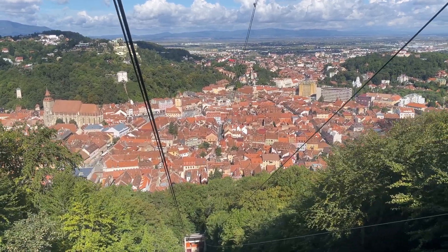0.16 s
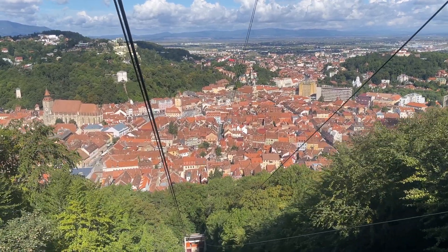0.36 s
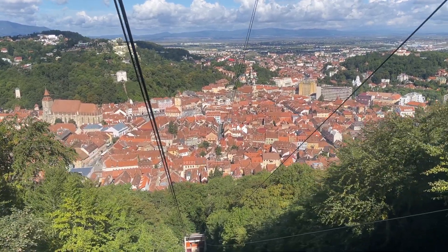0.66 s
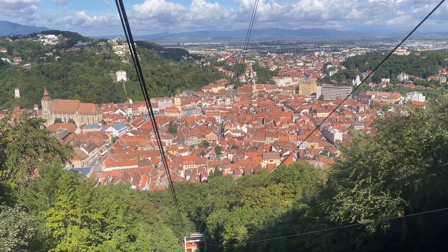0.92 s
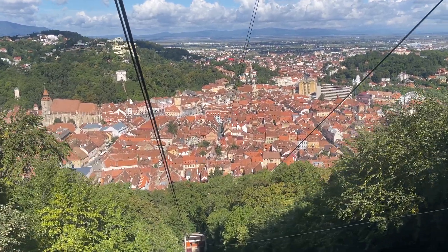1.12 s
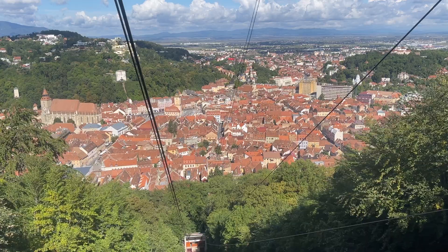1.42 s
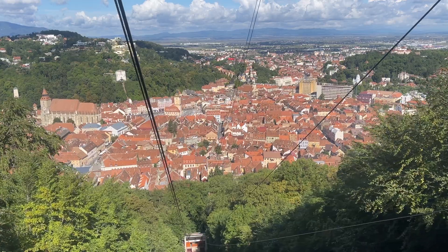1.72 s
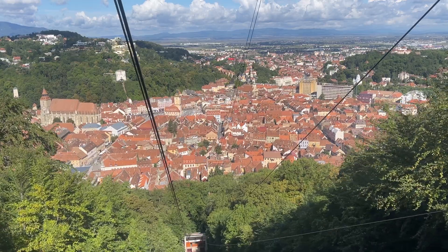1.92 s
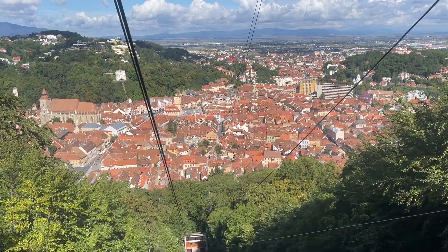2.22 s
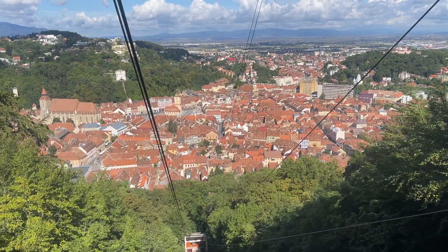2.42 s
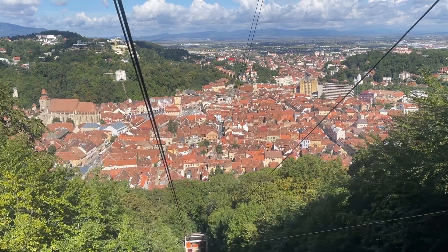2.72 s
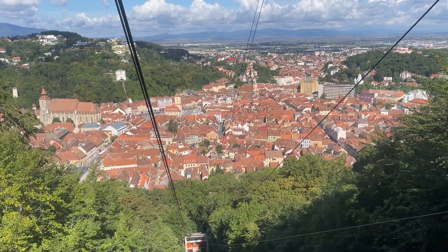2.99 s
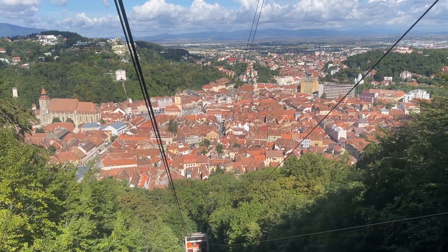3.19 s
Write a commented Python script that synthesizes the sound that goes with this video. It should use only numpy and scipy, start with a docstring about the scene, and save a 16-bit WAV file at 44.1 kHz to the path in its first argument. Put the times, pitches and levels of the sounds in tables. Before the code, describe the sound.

A cable car cabin rumbles deeply along its ropes, heard from inside in close stereo; muffled roar wavers, soft rustles and dull knocks sit beneath, and a light click comes at the very end.

```python
"""Cable car wheels throb in a deep drone, heard by a stereo microphone inside the cabin as it runs down its ropes.
The drone sums sine waves at multiples of the wheel rate, about six turns a second.
Filtered noise makes the rolling rumble, the roar on the rope, the hollow walls and the faintly ringing panels.
Grainy noise makes soft rustles, probably clothing, and small squeaks; short knocks are half buried in the roar.
At the end comes a light click: noise for its contacts, decaying sines for the fitting that they strike."""
import sys
import numpy as np
from scipy import signal
from scipy.io import wavfile
from scipy.ndimage import map_coordinates

SR = 44100
rng = np.random.default_rng(int(sys.argv[2]) if len(sys.argv) > 2 else 0)


def bounce(signal):
    """Save signal as a 16-bit WAV file at the path given by the first command-line argument."""
    frames = np.transpose(np.atleast_2d(signal))
    limited = np.clip(frames, -1, 1)
    pcm = np.round(limited * 32767).astype(np.int16)
    wavfile.write(sys.argv[1], SR, pcm)


N = 147735
T = np.arange(N) / SR  # seconds
LEFT_RIGHT = np.array([[1], [-1]])  # sign of a stereo difference


def from_db(db):
    """Decibels to amplitude gain."""
    return 10 ** (np.asarray(db) / 20)


def rms_one(x):
    """Scale to unit power."""
    return x / np.sqrt(np.mean(x ** 2) + 1e-20)


def at_hz(points, hz):
    """Read a table on a log-frequency axis."""
    table_hz, value = np.transpose(points)
    return np.interp(np.log(hz), np.log(table_hz), value)


def drift(rate):
    """Slow random wander of spread 1, from smoothed noise; a higher rate wanders faster."""
    step = 100  # samples between slow points
    pole = np.exp(-2 * np.pi * step * rate / SR)
    noise = rng.standard_normal(N // step + 2002)
    slow = signal.lfilter([1], [1, -2 * pole, pole * pole], noise)[2000:]  # drop the run-in
    return np.interp(np.arange(N) / step, np.arange(len(slow)), rms_one(slow - slow.mean()))


def envelope(start, attack, hold, release):
    """Straight rise, then exponential fall; hold counts from the start and includes the rise."""
    rise = np.clip((T - start) / attack, 0, 1)
    return rise * np.exp(-np.maximum(T - start - hold, 0) / release)


def cut_above(x, edge_hz):
    """Steep low-pass."""
    return signal.sosfilt(signal.butter(12, edge_hz, fs=SR, output="sos"), x)


# How alike the two microphone sides hear the cabin. Each row: frequency in Hz, correlation from -1 to 1.
SIDE_LIKENESS = [(40, 0.97), (120, 0.92), (280, 0.88), (500, 0.73), (800, 0.17), (1200, 0.036),
                 (2200, 0.37), (4500, 0.62), (9000, .93)]
# Lean of the cabin sound to one side. Each row: frequency in Hz, left minus right in dB.
SIDE_BALANCE = [(40, -3), (130, -4), (300, -2.5), (650, -0.5), (1300, -2.5), (2600, 2), (5000, 2.5),
                (9000, 0.5)]


def stereo_band(low, high, order=2):
    """A band of noise whose mid and side parts give the cabin's left-right likeness and balance."""
    sos = signal.butter(order, [low, min(high, SR / 2 - 10)], "band", fs=SR, output="sos")
    noise = rng.standard_normal((2, N + SR // 2))
    mid, side = signal.sosfilt(sos, noise)[:, -N:]  # drop the run-in
    hz = np.sqrt(low * high)
    alike = np.clip(at_hz(SIDE_LIKENESS, hz), -.999, .999)
    pair = np.sqrt(1 + alike) * mid + np.sqrt(1 - alike) * side * LEFT_RIGHT
    return pair * from_db(LEFT_RIGHT * at_hz(SIDE_BALANCE, hz) / 2)


def resonance(hz, width_hz):
    """Noise ringing in one resonance; rms 1."""
    return rms_one(stereo_band(max(hz - width_hz / 2, 20), hz + width_hz / 2))


def coloured_noise(spectrum, flicker_db, flicker_per_s):
    """Third-octave bands across the spectrum, each flickering on its own; rms 1."""
    edges = 15.6 * 2 ** (np.arange(30) / 3)  # Hz
    out = 0
    for low, high in zip(edges, edges[1:]):
        hz = np.sqrt(low * high)
        octaves_outside = max(np.log2(spectrum[0][0] / hz), np.log2(hz / spectrum[-1][0]), 0)
        if octaves_outside > 1:
            continue
        skirt_db = -24 * octaves_outside
        band_db = at_hz(spectrum, hz) + skirt_db + flicker_db * drift(flicker_per_s)
        out = out + from_db(band_db) * stereo_band(low, high, order=3)
    return rms_one(out)


SNAGS_PER_S, SNAG_S, SNAG_SHARE = 140, .002, .22  # mean rate, decay, share of the power


def snags():
    """Friction catches and lets go: a gain with sharp little peaks at random; rms 1."""
    catches = (rng.random(N) < SNAGS_PER_S / SR) * rng.exponential(1, N)
    power = signal.lfilter([1], [1, -np.exp(-1 / (SNAG_S * SR))], catches + 1e-18)
    return np.sqrt(1 - SNAG_SHARE + SNAG_SHARE * power / power.mean())


WHEEL_HZ = 6.285  # turns a second
DRONE_DB, DRONE_PAN_DB = 0.2, -0.5  # gain on all multiples; half of left minus right
SWELL_DB, SWELL_PER_S, SLIP_RAD = 1.0, 1.09, 0.58  # spread of level, rate of both wanders, spread of phase
THUMP_S, THUMP_SMEAR_RAD = 1.243, 1.235  # time of one thump; how loosely the multiples line up on it
# Strong multiples of the wheel rate. Each row: multiple, level in dB before DRONE_DB and the swells.
WHEEL_MULTIPLES = [(7, -34.5), (8, -35), (9, -25.5), (10, -34), (11, -21), (12, -33.5), (13, -25),
                   (15, -27), (16, -26.5), (19, -36.5), (27, -38.5), (29, -36.5), (30, -39), (33, -38),
                   (39, -40.5), (40, -41)]
# Slow swells and dips of single multiples.
# Each row: multiple, centre in seconds, seconds from there until 1/e of the gain in dB, gain in dB.
MULTIPLE_SWELLS = [(7, 0.13, 0.35, 6.5), (7, 3.6, .25, 7), (9, 1.55, 0.55, 8), (9, 3, .22, 5),
                   (9, 0.15, .15, -8.5), (10, 3.5, 0.12, 9.5), (11, 0.43, 0.59, 5), (12, 4.1, .22, 8.5),
                   (13, 1.3, 0.2, 4), (13, .05, .3, -4), (15, 0.038, .25, 5), (15, 2.8, 0.81, 8),
                   (16, 1.65, 0.13, -8.5), (16, 2.95, 0.26, 3.5), (19, .35, .25, 13), (19, 1.4, 0.25, 6),
                   (27, 2.3, 0.41, 8), (29, 0.71, 0.17, 6.5), (30, 1.2, .25, 7), (30, 3.3, 0.15, 6.5),
                   (39, 1.05, 0.52, 6)]


def wheel_drone():
    """Multiples of the wheel rate swell and slip slowly, lining up loosely once a turn."""
    out = 0
    for multiple, db in WHEEL_MULTIPLES:
        swell_db = sum(gain * np.exp(-((T - centre) / length) ** 2)
                       for swelling, centre, length, gain in MULTIPLE_SWELLS if swelling == multiple)
        turning = 2 * np.pi * multiple * WHEEL_HZ * (T - THUMP_S)
        smear = THUMP_SMEAR_RAD * rng.standard_normal()
        phase = turning + smear + SLIP_RAD * drift(SWELL_PER_S)
        level_db = db + DRONE_DB + swell_db + SWELL_DB * drift(SWELL_PER_S)
        out = out + from_db(level_db) * np.sqrt(2) * np.sin(phase)
    return out * from_db(DRONE_PAN_DB * LEFT_RIGHT)


# Colour of the rolling rumble. Each row: frequency in Hz, relative density in dB per Hz.
RUMBLE_COLOUR = [(15, -25.5), (28, -13.5), (45, -2.5), (68, -1.5), (100, -3.5), (145, -12), (200, -15.5),
                 (300, -25.5), (420, -33), (600, -37.5), (1000, -52.5)]


def rumble():
    """Low noise of the cabin rolling along, nearly steady."""
    return from_db(-19) * coloured_noise(RUMBLE_COLOUR, flicker_db=0.5, flicker_per_s=1.7)


# Hollow resonances of the cabin walls. Each row: frequency in Hz, width in Hz, dB relative to the growl level.
WALL_RESONANCES = [(135.8, 28, -5), (180.6, 24, -8), (209, 12, -12), (230.3, 14, -11), (249.47, 14, -5.5),
                   (269.3, 18, -11.5)]
# Growl level over time. Each row: time in seconds, level in dB.
WALL_LEVEL = [(0, -34), (.45, -30), (.8, -25.5), (1.3, -28), (1.7, -32), (1.92, -26.5), (2.35, -26.5),
              (2.7, -32), (3.3, -31.5)]


def growl():
    """Hollow wall resonances, ringing on noise, rise and fall together."""
    level_db = np.interp(T, *np.transpose(WALL_LEVEL))
    return from_db(level_db) * sum(from_db(db) * resonance(hz, width) for hz, width, db in WALL_RESONANCES)


ROAR_DB, ROAR_EDGE_HZ = 1.5, 2260  # gain on roar and hiss; top of the roar
HISS_DB = -24.5  # relative to the roar
# Colour of the wheels roaring on the rope. Each row: frequency in Hz, relative density in dB per Hz.
ROAR_COLOUR = [(200, -3), (400, 0.5), (600, -7), (800, -4.5), (1150, -12), (1500, -17.5), (1950, -23),
               (2400, -27.5)]
# Roar level over time. Each row: time in seconds, level in dB before ROAR_DB.
ROPE_LEVEL = [(.03, -42), (.2, -44), (.38, -42.5), (.47, -46), (.55, -38.5), (.68, -44), (.9, -42),
              (1.18, -44), (1.33, -40.5), (1.52, -41.5), (1.62, -39), (1.75, -42), (1.9, -41), (2.0, -46.5),
              (2.08, -42.5), (2.23, -48), (2.35, -41), (2.58, -47.5), (2.63, -44), (2.8, -49.5),
              (2.92, -40.5), (3.05, -42), (3.22, -49)]
# Colour of the faint air above the roar. Each row: frequency in Hz, relative density in dB per Hz.
HISS_COLOUR = [(2300, 0.5), (3200, -1.5), (4000, -5.5), (5000, -7), (7000, -10), (9000, -8.5),
               (11200, -16.5)]


def rope_roar(level_db):
    """Wheels roar on the rope as fast-flickering noise, with a faint hiss of air above."""
    roar = cut_above(coloured_noise(ROAR_COLOUR, flicker_db=3.0, flicker_per_s=41), ROAR_EDGE_HZ)
    hiss = from_db(HISS_DB) * coloured_noise(HISS_COLOUR, flicker_db=2.5, flicker_per_s=33)
    return from_db(level_db + ROAR_DB) * (roar + hiss)


RING_WANDER_SHARE, RING_WANDER_PER_S = .006, 2  # spread of pitch as a share, rate of wander
RING_FADE_DB, RING_FADE_PER_S = 2.2, 3  # spread of level, rate of wander


def loose_ring(hz, width_hz):
    """A resonance of a flexing panel: its pitch wanders and it comes and goes; rms 1."""
    warped = T + np.cumsum(RING_WANDER_SHARE * drift(RING_WANDER_PER_S)) / SR
    ring = np.array([np.interp(warped, T, side) for side in resonance(hz, width_hz)])
    return rms_one(ring * from_db(RING_FADE_DB * drift(RING_FADE_PER_S)))


# Ringing cabin panels. Each row: frequency in Hz, width in Hz, level in dB when the roar is at its mean dB.
PANEL_RINGS = [(327.3, 19, -45), (582, 36, -51), (800, 57, -60), (1074, 40, -55), (1181, 40, -63.5),
               (1279, 45, -60), (1604, 44, -65), (1897, 45, -70.5)]


def panels(level_db):
    """Panels ring faintly, excited by the wheels and so following the level of the roar."""
    rings = sum(from_db(db) * loose_ring(hz, width) for hz, width, db in PANEL_RINGS)
    return rings * from_db(level_db - level_db.mean())


def rolling():
    """Rumble and growl of the cabin, roar of the wheels and the panels that they excite."""
    level_db = np.interp(T, *np.transpose(ROPE_LEVEL))
    return rumble() + growl() + rope_roar(level_db) + panels(level_db)


# Dull bumps of the cabin fittings. Each row: start in seconds, centre in Hz, level in dB.
FITTING_BUMPS = [(0.544, 458, -35.5), (1.599, 618, -35), (1.71, 440, -40.5), (1.875, 335, -31.5),
                 (2.025, 1150, -47.5), (3.024, 1140, -41), (3.075, 680, -44.5)]
BUMP_WIDTH_SHARE = .35  # width relative to the centre


def bumps():
    """Soft short knocks, bursts of broad resonance half buried in the roar."""
    return sum(from_db(db) * envelope(start, attack=.026, hold=.015, release=.03)
               * resonance(hz, BUMP_WIDTH_SHARE * hz) for start, hz, db in FITTING_BUMPS)


RUSTLE_ATTACK_S, RUSTLE_RELEASE_S, RUSTLE_EDGE_HZ = 0.0026, 0.029, 10000
# Rustling strokes. Each row: start in seconds, seconds until the fade, level in dB.
RUSTLE_STROKES = [(.02, 0.054, -54.5), (0.356, 0.039, -55), (0.432, .02, -62), (0.495, 0.08, -55.5),
                  (0.619, 0.048, -57), (0.74, 0.036, -55), (0.975, 0.029, -57.5), (1.035, 0.013, -55),
                  (1.085, 0.069, -59.5), (1.225, 0.04, -54.5), (1.327, 0.036, -61), (1.355, 0.16, -62.5),
                  (1.51, 0.061, -63), (1.56, 0.051, -52), (1.695, 0.028, -59.5), (1.79, 0.034, -59.5),
                  (1.826, 0.019, -52), (2.087, 0.044, -56.5), (2.233, 0.037, -60.5), (2.302, 0.043, -56.5),
                  (2.395, 0.029, -60.5), (2.437, 0.046, -55), (2.611, 0.016, -56), (2.721, 0.044, -60),
                  (2.826, 0.081, -56), (2.898, 0.068, -55.5), (3.005, 0.046, -64)]
# Colour of the strokes. Each row: frequency in Hz, relative density in dB per Hz.
RUSTLE_COLOUR = [(400, 4), (1100, 11), (1900, 3.5), (2500, -2), (3100, -1), (3800, -4), (4500, -2.5),
                 (7000, -2.5), (8900, 1), (11200, -6.5)]
# Resonances in the rustle. Each row: frequency in Hz, width in Hz, dB relative to the stroke.
STROKE_RINGS = [(1086, 37, -1), (1890, 90, -9), (2925, 140, -19.5), (4420, 260, -13.5), (5300, 200, -20)]
# Longer, smoother rubs that only hiss. Each row: start in seconds, seconds until the fade, level in dB.
SLOW_RUBS = [(1.243, 0.19, -68.5), (2.883, 0.58, -63)]
# Colour of the rubs. Each row: frequency in Hz, relative density in dB per Hz.
RUB_COLOUR = [(2500, 1), (5400, -4), (7000, -8), (8900, 3.5), (11200, -19.5)]


def rustles():
    """Short grainy strokes of friction with a faint ring, and the thin hiss of slower rubs."""
    stroke_power = sum((from_db(db) * envelope(start, RUSTLE_ATTACK_S, hold, RUSTLE_RELEASE_S)) ** 2
                       for start, hold, db in RUSTLE_STROKES)
    grain = snags() * coloured_noise(RUSTLE_COLOUR, flicker_db=1.5, flicker_per_s=28)
    rings = sum(from_db(db) * resonance(hz, width) for hz, width, db in STROKE_RINGS)
    strokes = np.sqrt(stroke_power) * (grain + rings)
    rub_gain = sum(from_db(db) * envelope(start, .04, hold, RUSTLE_RELEASE_S) for start, hold, db in SLOW_RUBS)
    rubs = rub_gain * coloured_noise(RUB_COLOUR, flicker_db=2.5, flicker_per_s=25)
    return cut_above(strokes + rubs, RUSTLE_EDGE_HZ)


SQUEAK_HZ, SQUEAK_WIDTH_HZ = 5400, 1400
# Small squeaks. Each row: start in seconds, seconds until the fade, level in dB.
SQUEAK_SCUFFS = [(.212, .05, -76), (0.864, .018, -56.5), (0.918, .04, -74.5)]


def squeaks():
    """Brief, uneven high scuffs: snagging friction in one broad resonance."""
    gain = sum(from_db(db) * envelope(start, .0074, hold, .025) for start, hold, db in SQUEAK_SCUFFS)
    return gain * snags() * resonance(SQUEAK_HZ, SQUEAK_WIDTH_HZ)


CONTACT_HOLD_S, CONTACT_DECAY_S = 0.00094, 0.0012
CLICK_TAIL_DB, CLICK_TAIL_S = -9, 0.058  # relative to the contacts; decay
KNOCK_HZ, KNOCK_WIDTH_HZ, KNOCK_DB = 570, 150, 8  # low body of the click; level relative to its tail
CLICK_RISE_S, CLICK_PAN_DB = .0007, 1  # of the ringing fitting: rise, half of left minus right
# Contacts of the click. Each row: time in seconds, level in dB.
CLICK_CONTACTS = [(3.2753, -50), (3.2786, -43), (3.2829, -35), (3.2841, -37), (3.2868, -46), (3.2903, -41)]
# Colour of the click. Each row: frequency in Hz, relative density in dB per Hz.
CLICK_COLOUR = [(400, -7), (700, 6.5), (1500, 0.5), (2300, -5.5), (3300, -14.5), (4500, -9), (6200, -13),
                (8900, -11.5), (11200, -18)]
# What the struck fitting rings with.
# Each row: frequency in Hz, level in dB relative to the hardest contact, seconds to fall by 60 dB.
FITTING_MODES = [(592, -12, .2), (1174, -23, .1), (2090, -7, .022), (2320, 3, .028), (4856, -11, .023),
                 (6729, -14, .02)]


def click():
    """Quick contacts, the hardest setting a fitting ringing, with a low knock and a tail dying in the cabin."""
    contacts = sum(from_db(db) * envelope(start, .00021, CONTACT_HOLD_S, CONTACT_DECAY_S)
                   for start, db in CLICK_CONTACTS)
    tail_power = sum((from_db(db) * envelope(start, .0043, CONTACT_HOLD_S, CLICK_TAIL_S)) ** 2
                     for start, db in CLICK_CONTACTS)
    tail = from_db(CLICK_TAIL_DB) * np.sqrt(tail_power)
    crack = (contacts + tail * snags()) * coloured_noise(CLICK_COLOUR, flicker_db=1, flicker_per_s=80)
    hardest_s, hardest_db = max(CLICK_CONTACTS, key=lambda row: row[1])
    age = np.maximum(T - hardest_s, 0)
    ring = 0
    for hz, db, t60 in FITTING_MODES:
        decay_db = -60 * np.minimum(age / t60, 3)
        ring = ring + from_db(hardest_db + db + decay_db) * np.sin(2 * np.pi * hz * age)
    ring = ring * np.minimum(age / CLICK_RISE_S, 1) * from_db(CLICK_PAN_DB * LEFT_RIGHT)
    knock = tail * from_db(KNOCK_DB) * resonance(KNOCK_HZ, KNOCK_WIDTH_HZ)
    return crack + ring + knock


def scene():
    """Everything heard in the cabin."""
    return wheel_drone() + rolling() + bumps() + rustles() + squeaks() + click()


RIGHT_LAG_S, EASE_S, CUTOFF_HZ = .00003, .008, 12300


def record(dry):
    """Sound reaches the right microphone a little later; the ends are eased and the top is cut."""
    right = map_coordinates(dry[1], [np.arange(N) - RIGHT_LAG_S * SR], order=3, mode="nearest")
    to_nearest_end = np.minimum(T, T[-1] - T)
    ease = np.sin(np.pi / 2 * np.minimum(to_nearest_end / EASE_S, 1)) ** 2
    top_cut = signal.ellip(10, .2, 80, CUTOFF_HZ, fs=SR, output="sos")
    return signal.sosfilt(top_cut, ease * [dry[0], right])


dry = scene()
out = record(dry)
bounce(out)
```